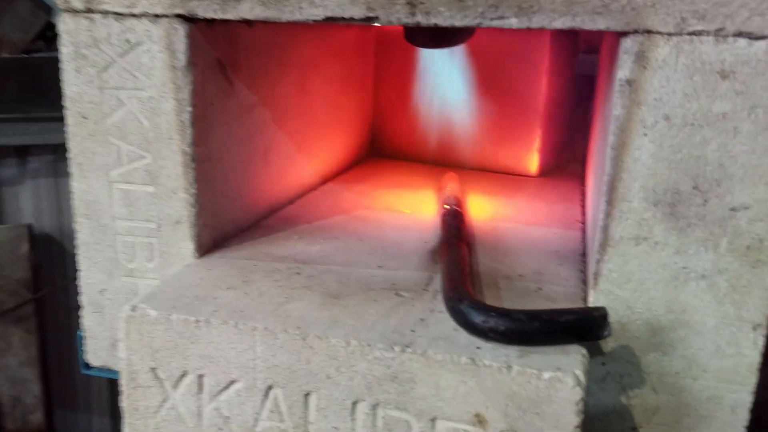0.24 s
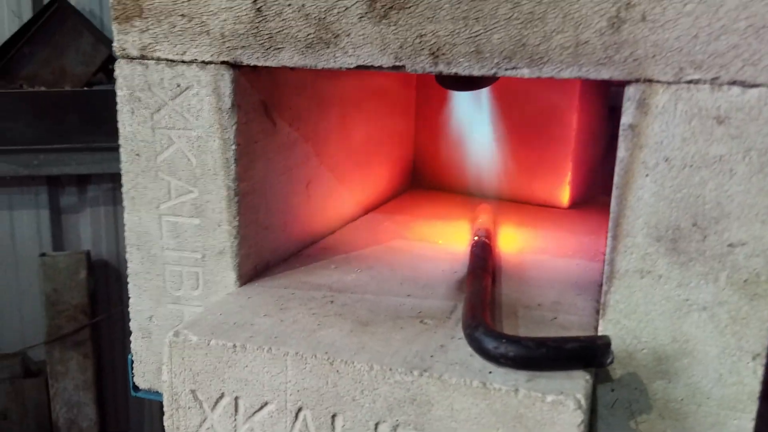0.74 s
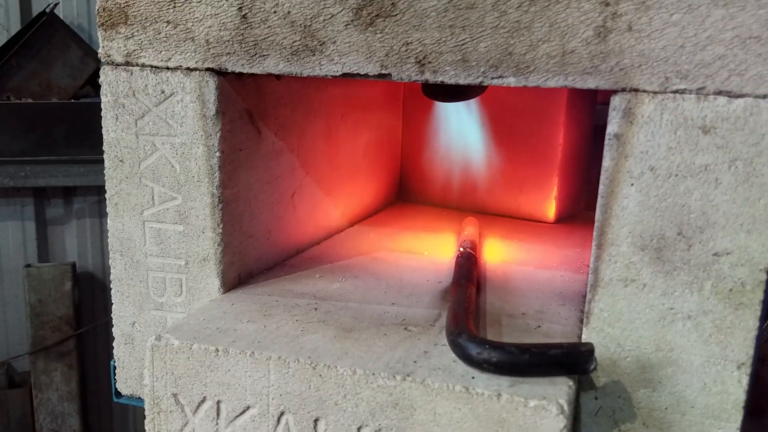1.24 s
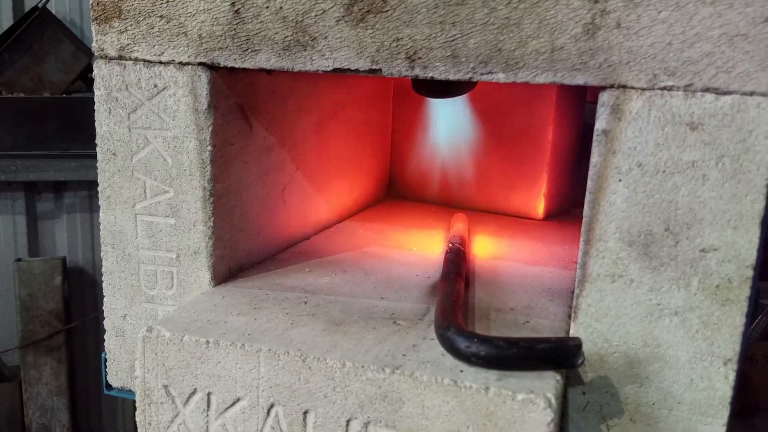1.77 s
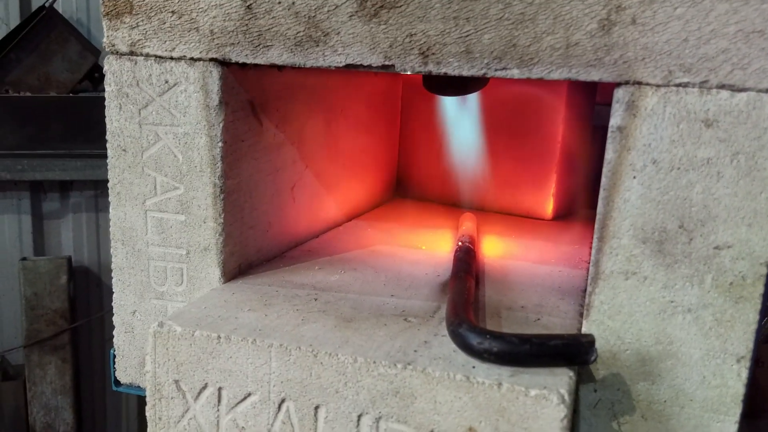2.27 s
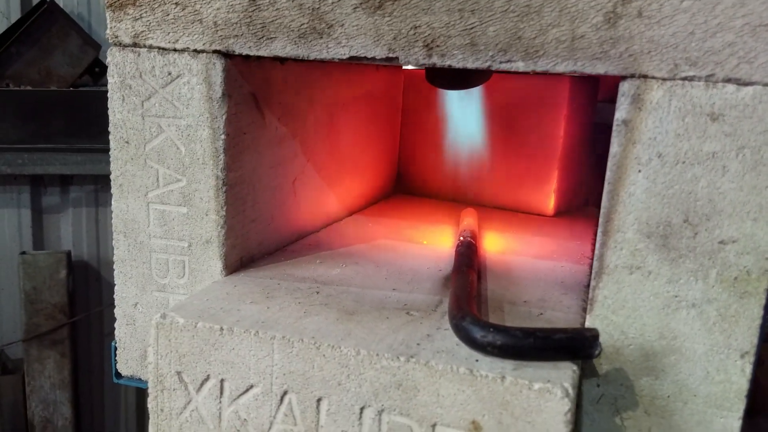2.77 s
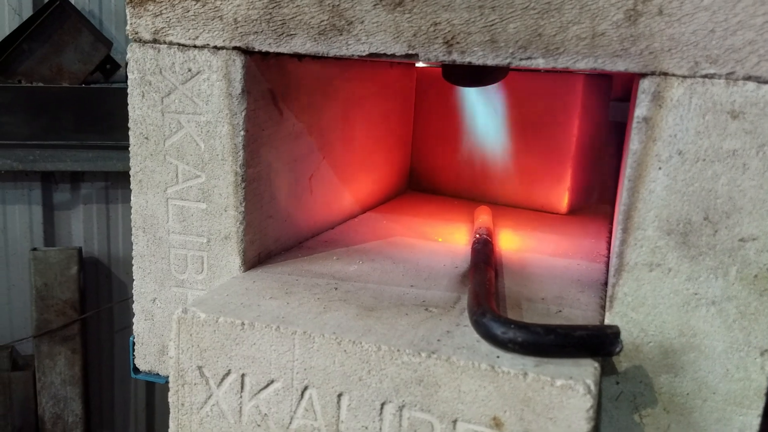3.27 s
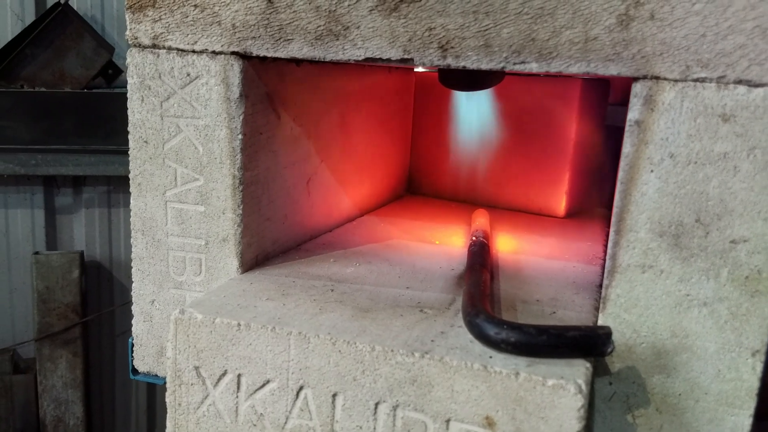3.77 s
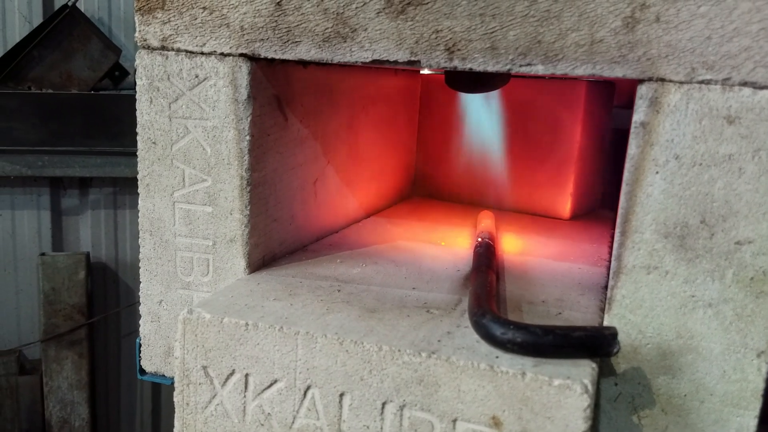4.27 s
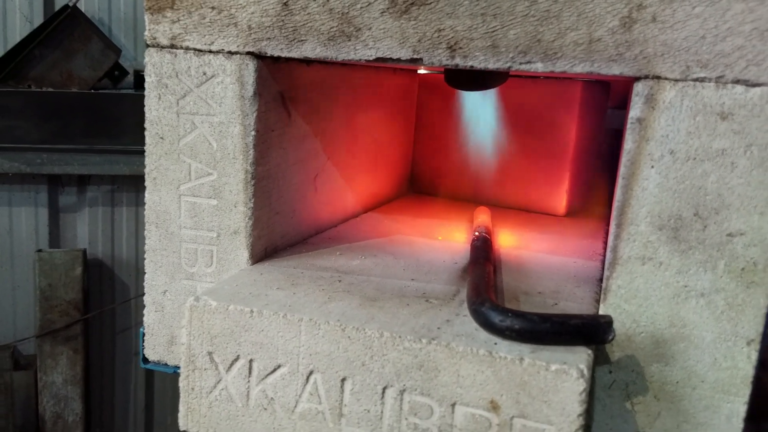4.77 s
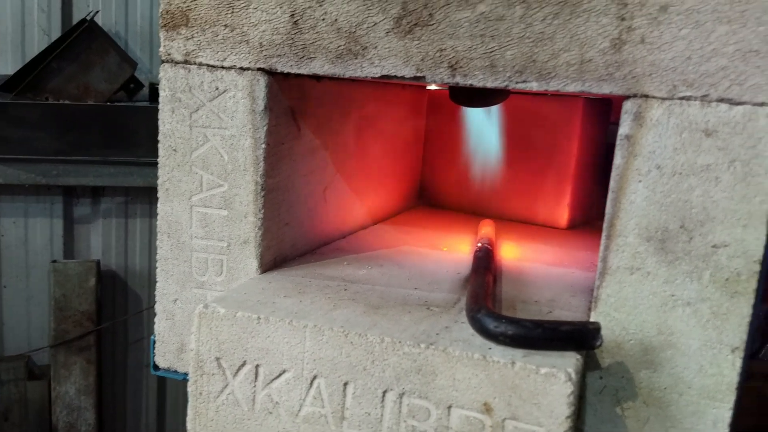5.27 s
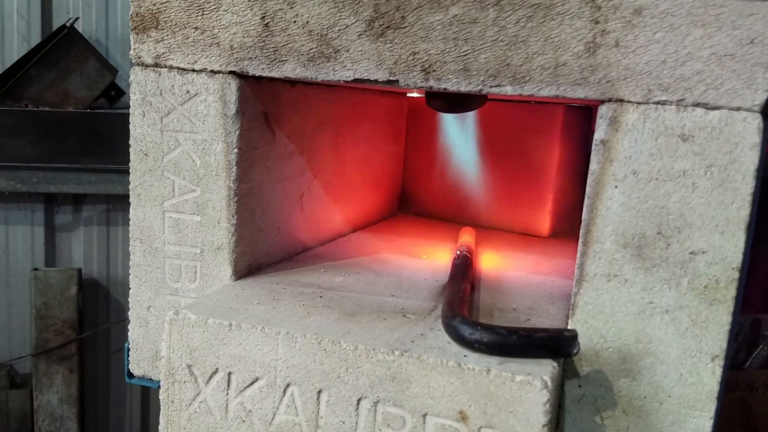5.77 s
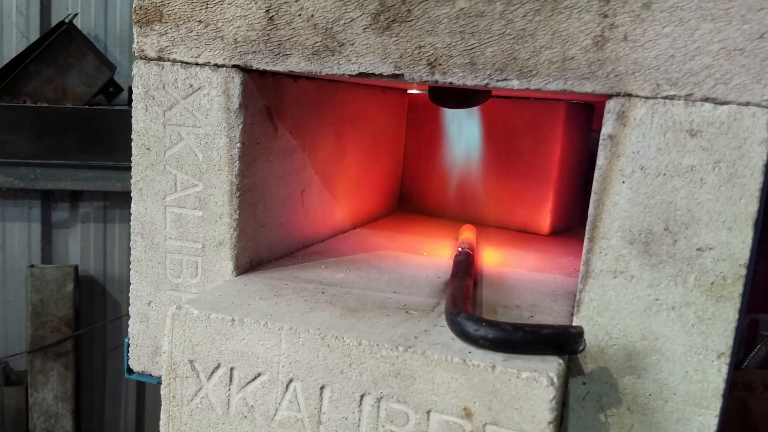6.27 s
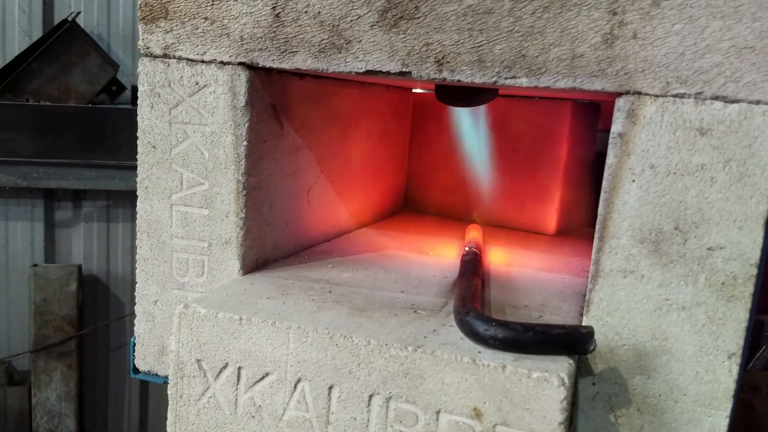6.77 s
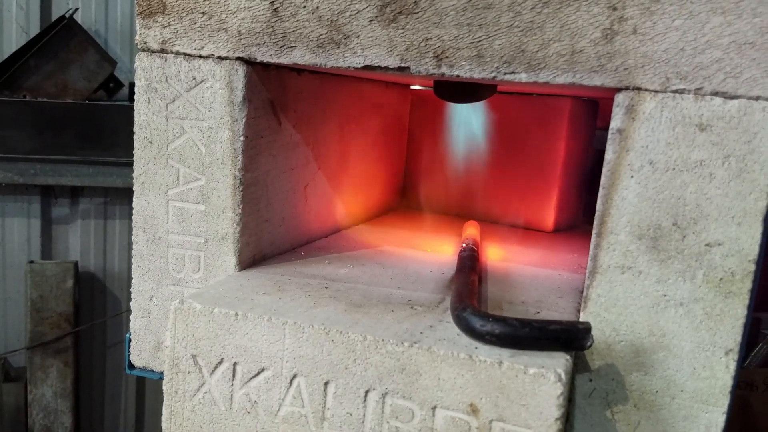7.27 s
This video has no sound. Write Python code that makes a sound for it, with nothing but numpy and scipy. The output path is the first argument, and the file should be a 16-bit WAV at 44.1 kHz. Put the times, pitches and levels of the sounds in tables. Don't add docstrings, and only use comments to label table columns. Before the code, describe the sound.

Low, unsteady propane forge roar with airy hiss and faint whistling gradually quietens, while shoes lightly scuff a gritty concrete floor.

```python
import sys
import numpy as np
from scipy import signal
from scipy.fft import rfft, irfft, next_fast_len
from scipy.io import wavfile

SR = 44100
rng = np.random.default_rng(int(sys.argv[2]) if len(sys.argv) > 2 else 0)


def digitize_waveform(pressure):
    field = np.atleast_2d(pressure).T
    bounded = np.clip(field, -1, 1)
    quanta = np.round(bounded * 32767).astype(np.int16)
    wavfile.write(sys.argv[1], SR, quanta)


def ratio(d):
    e = np.asarray(d, float) / 20
    return 10 ** e


N = 331632
PAD = next_fast_len(N + SR)
HZ = np.arange(PAD // 2 + 1) * SR / PAD + 1e-3

# time in seconds, change of flame turbulence in dB, of gas pressure in dB.
VALVE_CLOSING = [(0.0, -0.5, -1), (.5, -0.56, -1), (1.3, -1.5, -1.5), (1.85, -4.5, -1), (2.4, -6, -2),
                 (3.1, -6, -4), (3.7, -8.5, -4.5), (4.7, -9, -5.5), (5.2, -10, -6), (5.65, -12, -8),
                 (6.5, -13, -9), (7.52, -14, -10)]
# centre in Hz, width in Hz, level in dB.
CHAMBER_MODES = [(90, 8.7, -2.5), (110.7, 14, -3), (138.2, 23.2, 2.5), (169, 19, -4), (202.7, 26, 1.5),
                 (229, 65, -6.5), (250, 34, -11), (273, 14, -8.5)]
# frequency in Hz, power per Hz in dB.
RUMBLE_SPECTRUM = [(20, -44), (32, -30), (45, -14.5), (60, -10.5), (120, -2.5), (300, -17.5), (440, -27),
                   (600, -34.5), (1000, -72), (2000, -130)]
# centre in Hz, width in Hz, level in dB.
HUM_MODES = [(321, 38, -7.5), (341.4, 60, -4), (360.6, 21.3, 0.5), (392.4, 28.5, -3.5), (418.7, 13.8, -8)]
# frequency in Hz, power per Hz in dB.
EDDY_SPECTRUM = [(250, -8.5), (430, -2), (445, -6.5), (482, -5.5), (639, -11), (831, -25.5), (900, -28.5),
                 (1170, -62), (1980, -120)]
# centre in Hz, width in Hz, level in dB.
EDDY_MODES = [(476, 23, 2), (537, 56, -4.5), (595, 36, -13.5), (636, 16, -16.5), (686, 33, -15),
              (890, 45, -31)]
# frequency in Hz, power per Hz in dB.
TUBE_SPECTRUM = [(500, 0), (850, -3), (983, -8), (1060, 2.5), (1570, 2.5), (1930, -1), (2610, -13.5),
                 (3270, -12), (4300, -16), (4710, -16), (5760, -21), (6310, -18.5), (6850, -29),
                 (7500, -23.5), (9750, -54), (16500, -120)]
# frequency in Hz, power per Hz in dB.
JET_SPECTRUM = [(4000, -34), (6800, -4.5), (7500, -2), (8980, -0.5), (9570, 0), (11200, 2), (12200, 3.5),
                (13500, 8), (14200, 4), (14650, 7.5), (15200, 7.5), (16500, 4)]
# centre in Hz, width in Hz, level in dB.
LOW_WHISTLE_MODES = [(3320, 170, 0)]
# centre in Hz, width in Hz, level in dB.
HIGH_WHISTLE_MODES = [(3984, 63, 4.5), (4470, 55, 2.5), (4720, 125, 5.5), (5110, 180, 1.5),
                      (6300, 140, -10)]
# start in seconds, length in seconds, gain in dB.
LOCKED_SPELLS = [
    (0.0, 1.3, 6.5),
    (2.25, 1.4, 10),
    (3.9, 0.83, 8),
    (5.45, .3, 4.5),
    (6.1, .7, 7.5),
]
# frequency in Hz, power per Hz in dB.
SHED_SPECTRUM = [(1200, -8), (1600, -11), (2300, 3), (3300, -8), (4200, -10), (6500, -12.5), (10500, -17),
                 (12000, -13), (15600, -38)]
# centre in Hz, width in Hz, level in dB.
SHED_BAND = [(9000, 400, -1)]
# frequency in Hz, power per Hz in dB.
DRAUGHT_SPECTRUM = [(15, -22), (30, -18), (50, -4.5), (80, 5.5), (130, -20), (300, -67), (1000, -130)]
# frequency in Hz, left minus right in dB.
STEREO_LEAN = [(60, 1), (110, 0.0), (200, 0.0), (380, 0.5), (700, 0.5), (1290, 0), (2380, -0.5),
               (4400, -4.5), (8120, -6.5), (15000, -4.5)]
# frequency in Hz, side minus mid in dB.
STEREO_WIDTH = [(60, -31), (110, -34), (200, -28.5), (380, -20), (700, -12.5), (1290, -8.5), (2380, -4),
                (4400, 3), (8120, 0.5), (15000, 1)]
# start in seconds, level in dB, drag in seconds, tilt in dB per octave.
SHOE_SCUFFS = [(0.10, -46, 0.032, -7.5), (1.815, -51, 0.041, -9), (2.326, -50.5, 0.066, -6.5),
               (2.58, -49, 0.038, -8), (3.17, -55.5, .03, -2), (3.28, -53, .03, -8), (3.70, -55, .03, -11),
               (3.838, -48.5, 0.041, -6), (4.102, -52, 0.037, -7.5), (4.135, -47.5, 0.035, -7),
               (4.215, -50.5, 0.067, -8), (4.55, -54.5, 0.027, -9), (4.725, -56, 0.028, -6),
               (4.808, -44.5, 0.054, -6), (5.15, -54, 0.036, -11), (5.179, -54, .04, -11),
               (5.295, -53, 0.033, -8), (5.485, -54, 0.041, -8), (5.905, -58, .05, -12),
               (6.02, -55, .04, -8), (6.43, -53, 0.11, -10), (6.890, -45, 0.052, -8.5),
               (7.12, -54, .02, -9.5), (7.170, -54, 0.034, -8.5), (7.229, -54, 0.033, -12),
               (7.285, -53, 0.051, -8), (7.36, -49.5, 0.047, -11.5)]
# centre in Hz, width in Hz, level in dB.
SOLE_MODES = [(1350, 120, 5), (900, 97, -21.5), (1870, 150, -25), (2730, 810, 3.5)]
# start in seconds, level in dB, length in seconds, start in Hz, end in Hz.
SOLE_TWISTS = [
    (4.215, -64, 0.044, 1270, 1350),
    (4.83, -55, 0.031, 1300, 1490),
    (6.895, -58, 0.051, 1007, 1500),
    (6.90, -59, .05, 2400, 2850),
    (7.224, -57, 0.036, 1284, 1150),
    (7.31, -64, .025, 1870, 1950),
    (7.163, -53, .05, 850, 1550),
    (7.285, -53.5, .072, 1050, 1650),
    (7.347, -65, 0.036, 995, 1380),
    (7.40, -65, 0.071, 1190, 1410),
]
# start in seconds, level in dB, centre in Hz.
GRAIN_TICKS = [
    (4.731, -55, 4500),
    (5.266, -50, 4200),
]


def rms_one(x):
    return x / np.sqrt(np.mean(x ** 2) + 1e-20)


def at_hz(points, hz):
    table_hz, value = np.transpose(points)
    return np.interp(np.log(hz), np.log(table_hz), value)


def power_density(points):
    return ratio(2 * at_hz(points, HZ)) * np.minimum(HZ / points[0][0], 1) ** 8


def modes(rows, hz, order=2):
    return sum(ratio(2 * db) / (1 + (2 * (hz - centre) / width) ** 2) ** order for centre, width, db in rows)


def drift(rate_hz):
    coarse = 40
    pole = np.exp(-80 * np.pi * rate_hz / SR)
    noise = rng.standard_normal(N // coarse + 2002)
    slow = signal.lfilter([1], [1, -2 * pole, pole * pole], noise)[2000:]
    return np.interp(np.arange(N) / coarse, np.arange(len(slow)), rms_one(slow))


def stereo_noise(density, patchy_db=0., rate_hz=8., count=1, width_db=0.):
    mid, side = rfft(rng.standard_normal((2, PAD)))
    side = ratio(at_hz(STEREO_WIDTH, HZ) + width_db) * side
    lean = ratio(at_hz(STEREO_LEAN, HZ) * np.array([[.5], [-.5]]))
    both = np.array([mid + side, mid - side]) * lean * np.sqrt(density)
    semitone = (np.log2(HZ + 1) * 12).astype(int)
    group = rng.integers(0, count, 200)[semitone]
    out = np.zeros((2, N))
    for k in range(count):
        out += ratio(patchy_db * drift(rate_hz)) * irfft(both * (group == k), PAD)[:, :N]
    return out / np.sqrt(np.mean(out.mean(axis=0) ** 2))


def follow(start_db, turbulence_share, pressure_share):
    s, turbulence_db, pressure_db = np.transpose(VALVE_CLOSING)
    t = np.arange(N) / SR
    turbulence_db, pressure_db = np.interp(t, s, turbulence_db), np.interp(t, s, pressure_db)
    return start_db + turbulence_share * turbulence_db + pressure_share * pressure_db


def flame():
    rumble = stereo_noise(modes(CHAMBER_MODES, HZ) + power_density(RUMBLE_SPECTRUM))
    hum = stereo_noise(modes(HUM_MODES, HZ))
    eddies = stereo_noise(power_density(EDDY_SPECTRUM) + modes(EDDY_MODES, HZ))
    rumble_db = follow(-19.5, 1.002, .05) + 0.35 * drift(1.5)
    hum_db = follow(-26.5, .2, 1.03) + 1.77
    eddies_db = follow(-34.5, 1.136, 0.39) + 4.0 + 0.83 * drift(22)
    return ratio(rumble_db) * rumble + ratio(hum_db) * hum + ratio(eddies_db) * eddies


def burner():
    waver = drift(1.5)
    tube = stereo_noise(power_density(TUBE_SPECTRUM), patchy_db=1.35, rate_hz=9.4, count=4)
    jet = stereo_noise(power_density(JET_SPECTRUM), patchy_db=1.4, rate_hz=8.5, count=4)
    tube_db = follow(-46.5, 0.84, 0.3) - 1.2 + .5 * waver
    jet_db = follow(-54.5, .05, 0.98) + 1.5 + 0.39 * waver
    return ratio(tube_db) * tube + ratio(jet_db) * jet


def lock_in():
    t, lock_s = np.arange(N) / SR, .12
    gain_db = np.zeros(N)
    for s, length, db in LOCKED_SPELLS:
        inside_s = np.minimum(t - s, s + length - t)
        gain_db += db * np.clip(1 + inside_s / lock_s, 0, 1)
    return gain_db


def whistles():
    low = stereo_noise(modes(LOW_WHISTLE_MODES, HZ), patchy_db=1.2, rate_hz=6, width_db=-5)
    high = stereo_noise(modes(HIGH_WHISTLE_MODES, HZ), patchy_db=1.5, rate_hz=5, count=3, width_db=-4)
    low_db = follow(-73.5, 0.41, .3) + lock_in() - 2.0
    high_db = follow(-62.5, 1.7, 0) - 1.0
    return ratio(low_db) * low + ratio(high_db) * high


def shed():
    hiss_density = power_density(SHED_SPECTRUM) + modes(SHED_BAND, HZ)
    hiss = stereo_noise(hiss_density, patchy_db=.8, rate_hz=8, count=2)
    draught = stereo_noise(power_density(DRAUGHT_SPECTRUM), patchy_db=1.0, rate_hz=1.0)
    return ratio(-69) * hiss + ratio(-42) * draught


def scuffs():
    rise, lead, span = 0.0074, 200, SR // 2
    pan_db = -3.5 * np.array([[.5], [-.5]])
    t, hz = np.arange(span) / SR, np.arange(span // 2 + 1) * 2 + 1e-3
    sole = (1 + ratio(2 * -1.5) * modes(SOLE_MODES, hz)) / (1 + (650 / hz) ** 6)
    out = np.zeros((2, N + SR))
    for s, db, drag, tilt_db in SHOE_SCUFFS:
        stroke = np.clip(t / rise, 0, 1) * np.exp(-(np.maximum(t - rise, 0) / drag) ** 2.2)
        grain_db = 3.5 * np.minimum(rng.exponential(1, span), 5)
        grit = rng.standard_normal((2, span)) * ratio(grain_db)
        grit = rms_one(grit + 0.049 * grit[::-1])
        colour = np.sqrt(sole) * ratio(tilt_db * np.log2(np.maximum(hz, 1000) / 1000))
        colour = colour / np.sqrt(np.mean(colour ** 2))
        decay = np.clip(t / (rise + drag), 0, 1) * np.exp(-t / 0.11)
        tail = ratio(-3.5) * decay * rng.standard_normal((2, span))
        dry_scuff = np.roll(grit * stroke + tail, lead, axis=1)
        sound = irfft(rfft(dry_scuff) * colour, span)
        at = round(s * SR) - lead
        out[:, at:at + span] += ratio(db + pan_db) * sound
    return out[:, :N]


def twists():
    width_hz = 320
    low_pass = signal.butter(2, width_hz / 2, fs=SR, output="sos")
    out = np.zeros((2, N))
    for s, db, length, start_hz, end_hz in SOLE_TWISTS:
        at, size = round(s * SR), round(length * SR)
        phase = 2 * np.pi * np.cumsum(np.linspace(start_hz, end_hz, size)) / SR
        slow = signal.sosfilt(low_pass, rng.standard_normal((2, 2, 8000)))
        in_phase, quadrature = rms_one(slow)[:, :, 2000:2000 + size]
        band = in_phase * np.cos(phase) + quadrature * np.sin(phase)
        swell = np.hanning(size) ** 0.39
        out[:, at:at + size] += ratio(db) * swell * (band + 0.28 * band[::-1])
    return out


def ticks():
    t = np.arange(400) / SR
    out = np.zeros((2, N))
    for s, db, hz in GRAIN_TICKS:
        resonance = signal.butter(1, [hz * .55, hz * 1.2], "band", fs=SR, output="sos")
        snap = signal.sosfilt(resonance, rng.standard_normal(len(t)) * np.exp(-t / .0012))
        at = round(s * SR)
        out[:, at:at + len(t)] += ratio(db + 9 + np.array([[-.7], [.7]])) * snap
    return out


def scene():
    forge = flame() + burner() + whistles()
    footsteps = scuffs() + twists() + ticks()
    return forge + shed() + footsteps


def top_cut(x):
    return signal.sosfilt(signal.butter(12, 16850, fs=SR, output="sos"), x)


def record(dry):
    top_hz = 15790
    mix = irfft(rfft(dry, PAD) * (HZ < top_hz), PAD)[:, :N]
    return top_cut(mix)


dry = scene()
out = record(dry)
digitize_waveform(out)
```